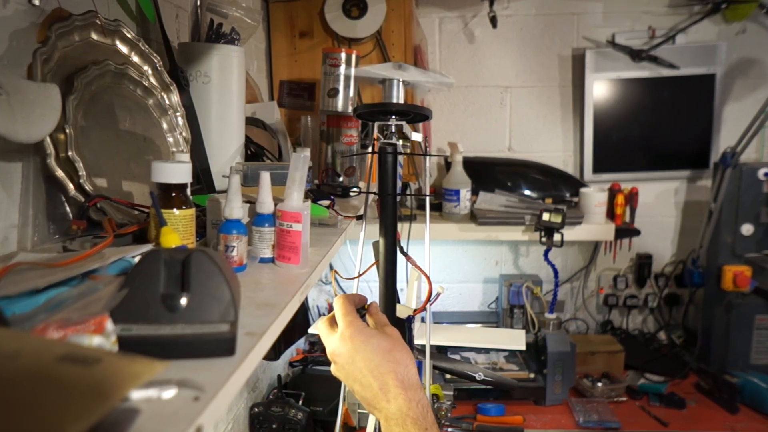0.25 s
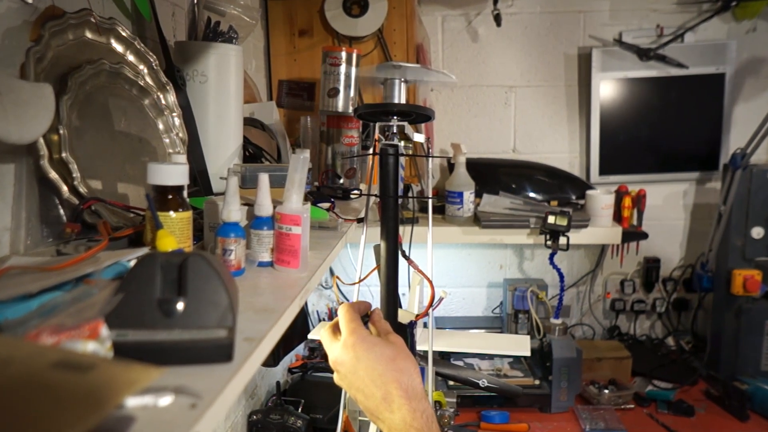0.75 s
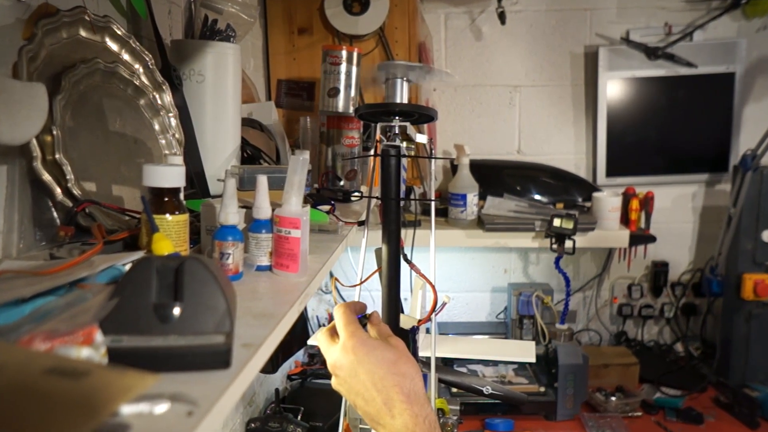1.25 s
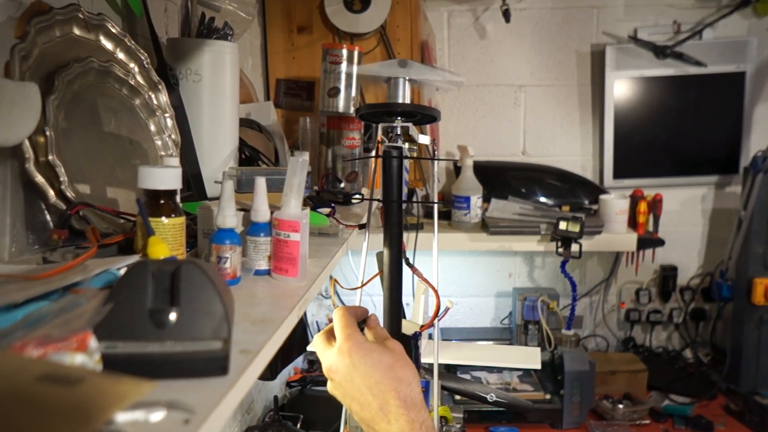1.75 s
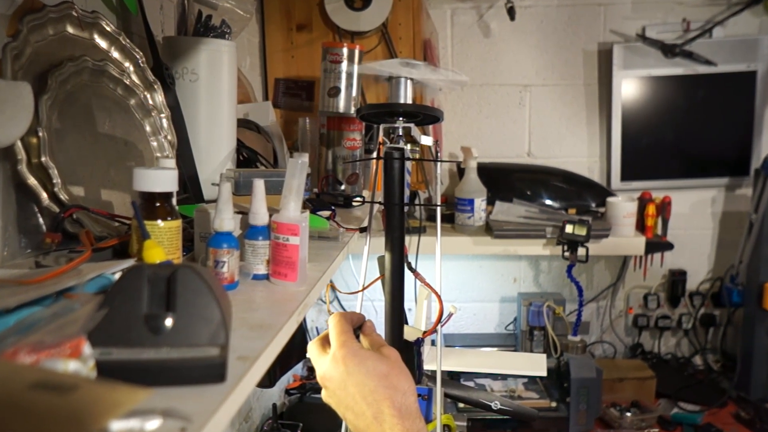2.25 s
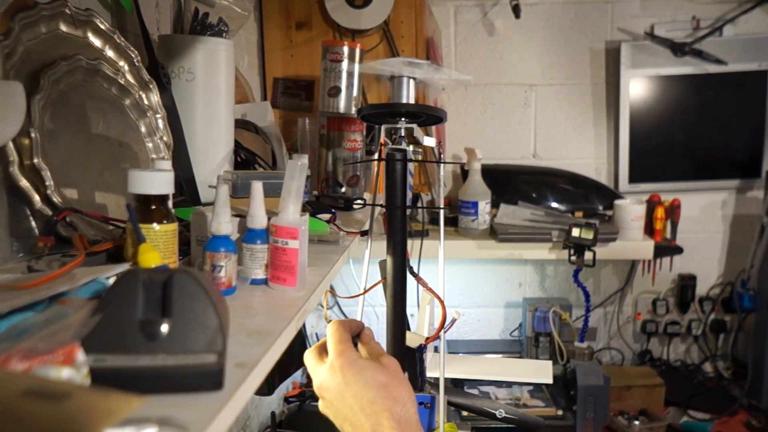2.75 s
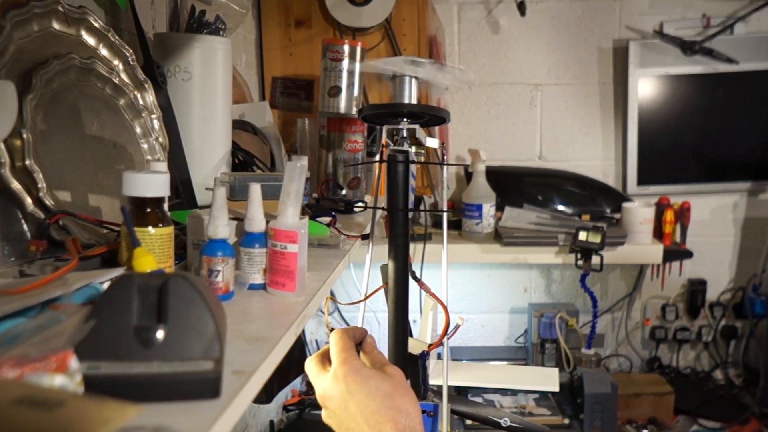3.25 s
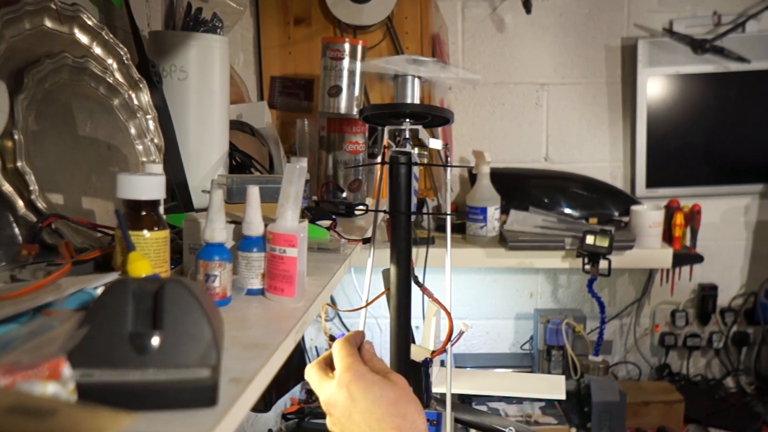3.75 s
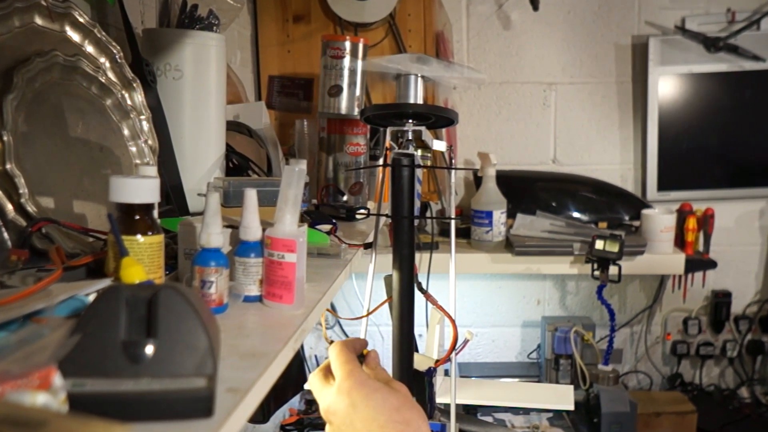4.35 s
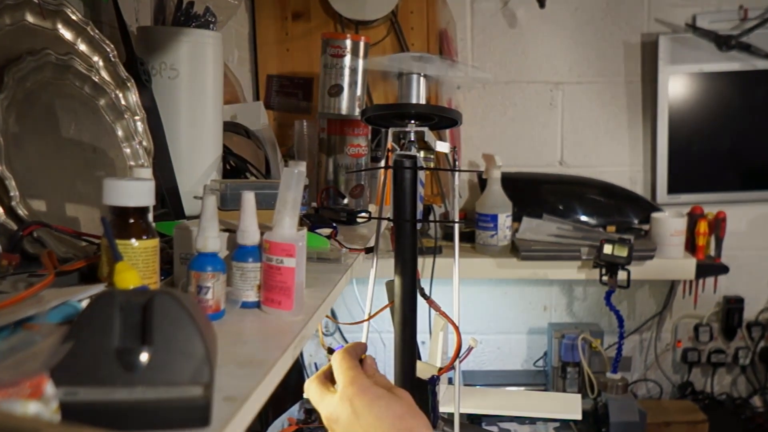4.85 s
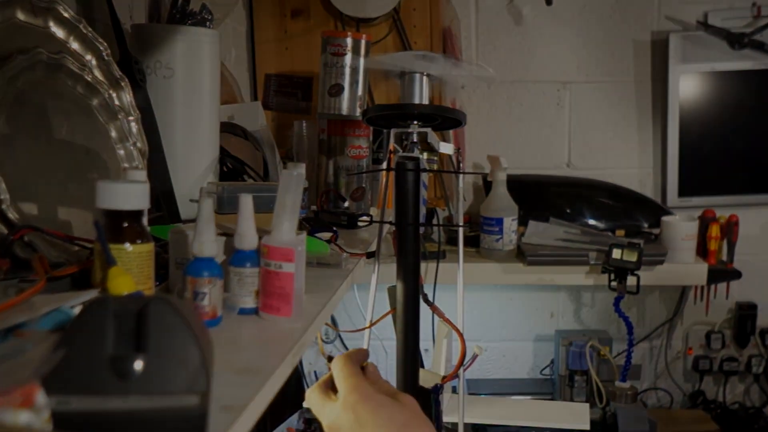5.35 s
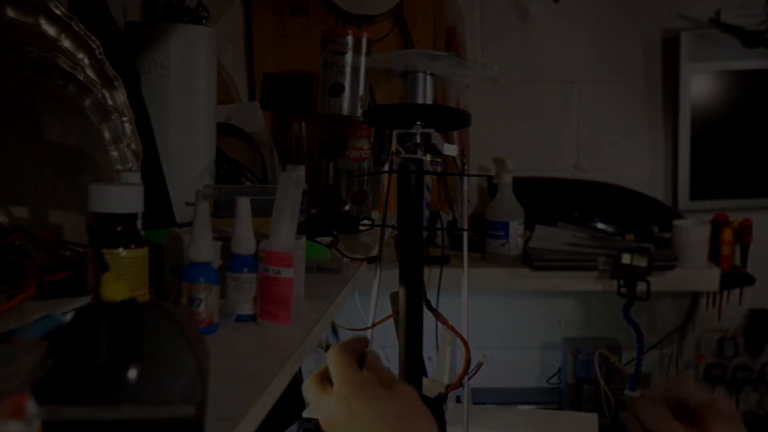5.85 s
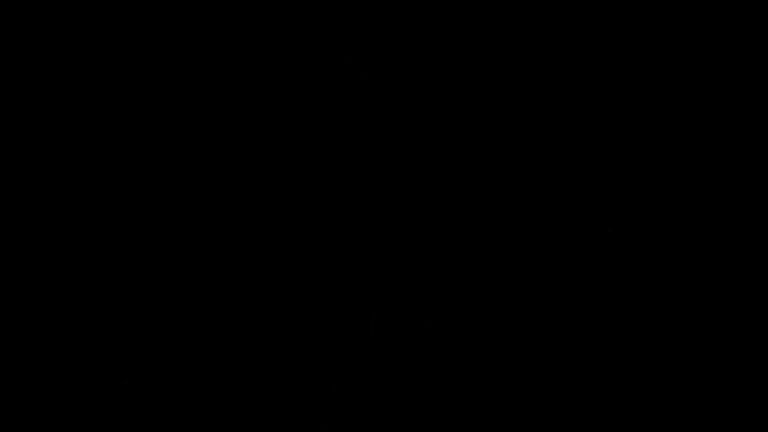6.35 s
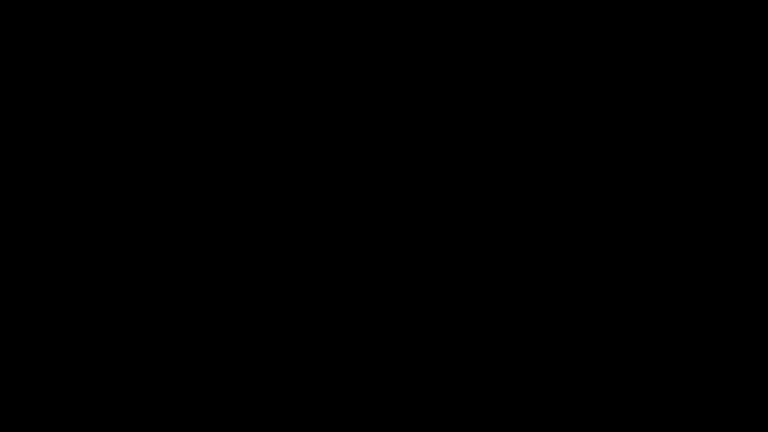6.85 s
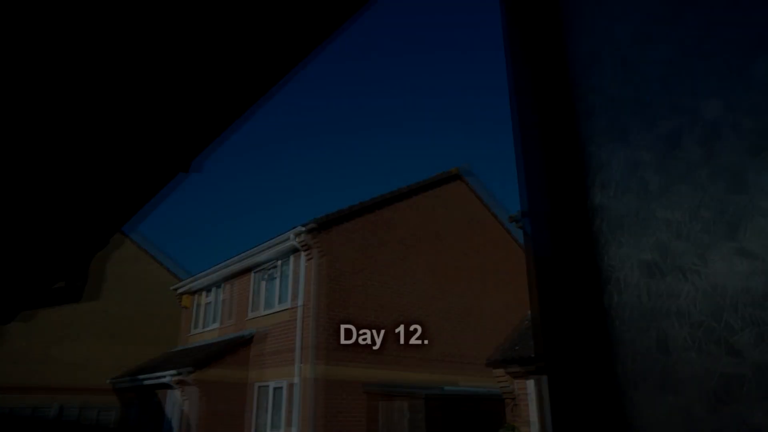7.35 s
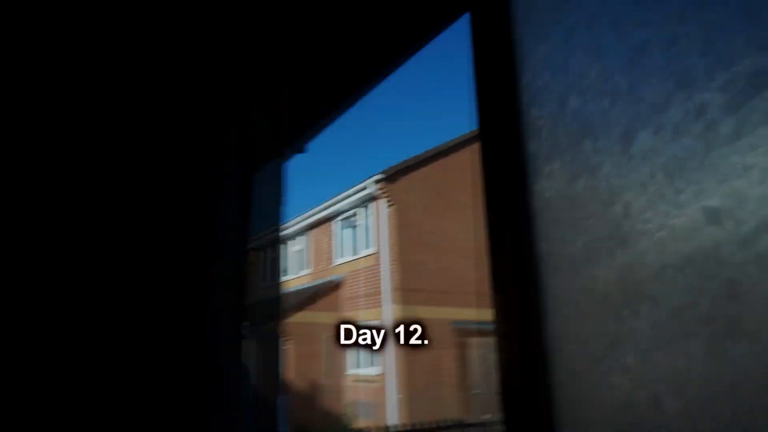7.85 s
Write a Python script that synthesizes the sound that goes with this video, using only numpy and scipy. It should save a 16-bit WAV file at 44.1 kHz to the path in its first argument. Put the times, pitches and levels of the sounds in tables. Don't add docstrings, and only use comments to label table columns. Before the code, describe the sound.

A geared brushless motor runs close to a stereo microphone in a lightly reverberant workshop. Its piercing whine sags, rises and settles high while a regular rasping rub rattles the frame many times a second. After a long fade, a quiet doorway takes over: soft air, distant hum, brief echoing bird chirps, a light hand rub and a crisp metal latch knocking open.

```python
import sys
import numpy as np
from scipy import signal
from scipy.fft import rfft, irfft, next_fast_len
from scipy.io import wavfile
from scipy.ndimage import uniform_filter1d, map_coordinates

SR = 44100
rng = np.random.default_rng(int(sys.argv[2]) if len(sys.argv) > 2 else 0)


def generate_wav(signal):
    frames = np.transpose(np.atleast_2d(signal))
    scaled = np.clip(frames, -1, 1) * 32767
    pcm = np.round(scaled).astype(np.int16)
    wavfile.write(sys.argv[1], SR, pcm)


def to_linear_factor(level_db):
    exponent = np.asarray(level_db, float) / 20
    return 10 ** exponent


N = 357210

# (time [s], pole whine [Hz], whine level [dB])
MOTOR_RUN = [(0.0, 2123, -33.5), (0.25, 1900, -37), (0.46, 1815, -46), (0.64, 1820, -41.5),
             (0.8, 1943, -40.5), (1.0, 2010, -35), (1.62, 2052, -45), (2.08, 2201, -30), (2.42, 2300, -37),
             (2.74, 2368, -28), (3.19, 2442, -35.5), (3.55, 2590, -31), (3.83, 2728, -26.5),
             (4.0, 2762, -23), (4.37, 2784, -27.5), (4.43, 2800, -41), (4.49, 2882, -27.5),
             (6.8, 2890, -25)]
POLES, GEAR_RATIO = 14, 10
POLES_PER_TURN = GEAR_RATIO * POLES
# (start [s], end [s])
WORKSHOP_FADE = (4.8, 6.803)
# (frequency [Hz], t60 [s])
SHOP_T60 = [(300, .3), (3000, 0.25), (12000, .12)]


def unit(x):
    return x / np.sqrt(np.mean(x ** 2) + 1e-20)


def along(points, hz):
    f, v = np.transpose(points)
    return np.interp(np.log(hz + 1), np.log(f + 1), v)


def curves(rows):
    s, *cols = np.transpose(rows)
    return [np.interp(np.arange(N) / SR, s, c) for c in cols]


def wobble(rate):
    knots = rng.standard_normal(int(N * rate / SR) + 4)
    return map_coordinates(knots, [np.arange(N) * rate / SR])


def filtered(x, response):
    m = next_fast_len(N + SR // 2)
    return irfft(rfft(x, m) * response(np.fft.rfftfreq(m, 1 / SR)), m)[..., :N]


def ringing(modes, hz):
    grid = np.arange(0, SR / 2, 4)
    power = sum(to_linear_factor(db) ** 2 / (1 + (2 * (grid - c) / w) ** 2) ** 1.348 for c, w, db in modes)
    return np.interp(hz, grid, np.sqrt(power))


def gritty(grit_db, rate):
    return unit(rng.standard_normal((2, N)) * to_linear_factor(grit_db * wobble(rate)))


def patchy(x, patchy_db):
    z = signal.stft(x, nperseg=512)[2]
    field = uniform_filter1d(rng.standard_normal(z.shape[1:]), size=7, axis=0)
    field = uniform_filter1d(field, size=8, axis=1)
    return unit(signal.istft(z * to_linear_factor(patchy_db * unit(field)), nperseg=512)[1][:, :N])


def spread(pair, response):
    # (frequency [Hz], likeness [0-1])
    likeness = [(40, 0.94), (150, 1), (500, .96), (2000, 0.95), (4500, 0.86), (7500, 0.98), (11000, 1),
                (13000, 1)]

    def mid_side(hz):
        turn = np.arccos(np.clip(along(likeness, hz), -1, 1)) / 2
        return response(hz) * [np.cos(turn), np.sin(turn)]

    mid, side = filtered(pair, mid_side)
    return np.array([mid + side, mid - side])


def room(x, t60s):
    hz, t, z = signal.stft(rng.standard_normal((2, SR // 2)), SR, nperseg=256)
    tail = signal.istft(z * to_linear_factor(-60 * t / along(t60s, hz)[:, None]), SR, nperseg=256)[1]
    wet = signal.fftconvolve(x, tail / np.linalg.norm(tail[0]), axes=1)[:, :N]
    return spread(wet, np.ones_like)


def whine():
    # (pole whine [Hz], level [dB])
    octave_level = [(1810, -41.5), (2030, -42), (2110, -31.5), (2190, -37.5), (2270, -32.5), (2310, -24.5),
                    (2500, -27.5), (2545, -44), (2890, -58)]
    shaft_level = [(1900, -72), (2400, -68), (2640, -62), (2765, -56), (2890, -60)]
    fourth_level = [(1900, -60), (2500, -58.5), (2650, -42.5), (2750, -43), (2780, -54), (2890, -52)]
    switch_level = [(1900, -46.5), (2300, -42), (2630, -47), (2890, -67.5)]
    sideband_level = [(1815, -47), (1900, -41), (2040, -48.5), (2200, -42), (2450, -35.5), (2540, -47.5),
                      (2760, -52), (2890, -61.5)]
    # (pole whine [Hz], left over right [dB])
    whine_pan = [(2300, -0.3), (2630, 4), (2770, -0.5), (2880, -5)]
    switch_hz = 8009

    pole_hz, whine_db = curves(MOTOR_RUN)

    def level(points, rate):
        return to_linear_factor(along(points, pole_hz) + 1.8 * wobble(rate))

    pole = 2 * np.pi * np.cumsum(pole_hz + 1.5 * wobble(25)) / SR
    switch = 2 * np.pi * switch_hz * np.arange(N) / SR
    turn = pole / POLES_PER_TURN
    throb = 1 + 0.23 * np.sin(2 * turn) + 0.15 * np.sin(turn)
    octave = level(octave_level, 9) * throb * to_linear_factor(1.8 * wobble(28)) * np.sin(2 * pole)
    shaft = level(shaft_level, 2.6) * np.sin(pole / POLES)
    fourth = level(fourth_level, 3.9) * np.sin(4 * pole)
    sideband = level(sideband_level, 2.5) * np.sin(switch + pole)
    switching = level(switch_level, 3) * np.sin(switch)
    pan_db = along(whine_pan, pole_hz)
    main = to_linear_factor(whine_db + 1.9 * wobble(30)) * np.sin(pole + np.array([[.3], [-.3]]))
    main = main * to_linear_factor([pan_db / 2, -pan_db / 2])
    return np.sqrt(2) * (main + octave + shaft + fourth + sideband + switching)


def rubs(whirr_db):
    # (time [s], hiss level [dB], length [ms])
    marked_rubs = [(0.041, -23, 14.6), (0.1, -35.5, 25), (0.165, -21.5, 20), (0.238, -24, 23),
                   (0.306, -39.5, 25), (0.385, -24.5, 29), (0.469, -26.5, 29), (0.609, -26, 44),
                   (0.759, -23.5, 49), (0.911, -20.5, 16), (0.978, -20.5, 17.8), (1.12, -26, 88),
                   (1.198, -22.5, 17), (1.257, -23.5, 61), (1.459, -24, 66), (1.599, -22.5, 39),
                   (1.677, -23.5, 79), (2.062, -27.5, 45), (2.313, -20, 15), (2.435, -19.5, 12),
                   (2.85, -25, 19.7), (3.204, -26, 35), (3.491, -25.5, 36), (3.859, -28, 29),
                   (4.211, -24, 27.4), (4.268, -36, 44), (4.394, -25.5, 45), (5.255, -26.5, 22),
                   (5.876, -30.5, 33), (6.413, -30.5, 26)]
    rub_over_whirr_db, rub_scatter_db = 0.06, 1
    length_turns, length_scatter = 0.51, 0.24
    echo_turns, echo_db, echo_scatter_db, echo_ms = .55, -9, 4, 18

    pole_hz = curves(MOTOR_RUN)[0]
    turns = np.cumsum(pole_hz) / (SR * POLES_PER_TURN)
    marked = np.array(marked_rubs)
    angle = turns[np.round(marked[:, 0] * SR).astype(int)]
    index = np.r_[0, np.cumsum(np.round(np.diff(angle)))].astype(int)
    every = np.arange(int(np.interp(WORKSHOP_FADE[1] * SR, np.arange(N), turns)))
    at = np.searchsorted(turns, every + np.interp(every, index, angle - index))
    turn_s = POLES_PER_TURN / pole_hz[at]

    luck = rng.standard_normal((N // 2000, 3))[every]
    ms = 1000 * length_turns * turn_s * np.exp(length_scatter * luck[:, 0])
    rows = np.c_[at / SR, whirr_db[at] + rub_over_whirr_db + rub_scatter_db * luck[:, 1], ms]
    rows[index] = marked
    late_s = rows[:, 0] + echo_turns * turn_s
    late_db = whirr_db[at] + echo_db + echo_scatter_db * luck[:, 2]
    return np.r_[rows, np.c_[late_s, late_db, np.full(len(at), echo_ms)]]


def rotor():
    # (time [s], whirr level [dB], rattle over rub hiss [dB])
    whirr_run = [(0, -27, 12), (.6, -24, 4), (1.8, -25, 4.5), (3.6, -26.5, 6), (4.6, -31, 4.5),
                 (5.2, -31.5, 7), (6.8, -29, 5.5)]
    # (centre [Hz], width [Hz], level [dB])
    mast_modes = [(392, 37, -26), (606.5, 87, -15.5), (756.6, 53, -7.5), (933, 206, -9.5), (1067, 70, -1),
                  (1105.7, 17.2, 6), (1255, 99, -8), (1397, 67, -7.5), (1715, 130, -6.5), (2250, 210, -8),
                  (2540, 150, -5), (2840, 215, 1.5), (3157, 320, -4), (3674, 310, -1), (3986, 120, -1.5),
                  (4283, 160, -2.5), (4950, 290, -4), (5594, 250, -2.5), (6063, 420, -4), (6750, 130, -6.5),
                  (7275, 320, -7), (8585, 200, -6), (9390, 130, -7), (9860, 260, -5), (10740, 180, -14),
                  (13200, 350, -14), (15200, 300, -15.5)]
    # (frequency [Hz], level [dB per Hz])
    frame_colour = [(20, -49), (60, -62.5), (250, -36.5), (500, -36.5), (1500, -14.5), (2000, -14),
                    (4500, -12), (7900, -16), (9000, -15.5), (12000, -17.5), (14500, -18.5), (15700, -27)]
    # (frequency [Hz], gain [dB])
    gear_colour = [(300, -2.5), (1100, 0.5), (2800, -5.5), (6000, -2.5), (10000, -3.5), (15000, -7.5)]
    # (centre [Hz], width [Hz], level [dB])
    tip_modes = [(15330, 330, 0), (13400, 300, -9), (9770, 350, -2), (5970, 400, -1)]
    touch_db, touch_s = -7.5, 0.018
    split_hz = 7000
    load_swing_db, load_peak_turns = 0.88, 0.31

    whirr_db, rattle_db = curves(whirr_run)
    rows = rubs(whirr_db)
    count = len(rows) // 2
    turns = np.interp(np.arange(N) / SR, rows[:count, 0], np.arange(count))
    whirr_db = whirr_db + load_swing_db * np.cos(2 * np.pi * (turns - load_peak_turns))

    hiss, rattle, touch = np.zeros((3, N))
    t = np.arange(SR // 5) / SR
    build = 1 - np.exp(-t / .005)
    for s, db, ms in rows:
        release = 1 + np.exp(np.clip((t - ms / 1000) / 0.0092, -40, 40))
        shape = (1 - np.exp(-t / 0.0028)) * to_linear_factor(-60 * t) / release
        at = round(s * SR)
        bright = 1 + .8 * np.exp(-t / 0.0033)
        hiss[at:][:len(t)] += (to_linear_factor(db) * shape) ** 2 * bright
        touch[at:][:len(t)] += (to_linear_factor(db + touch_db) * shape * np.exp(-t / touch_s)) ** 2
        rub_rattle_db = db + rattle_db[at] - 2.0 - .5 * (db + 27.0)
        rattle[at:][:len(t)] += (to_linear_factor(rub_rattle_db) * shape * build) ** 2

    def colour(hz):
        return np.hypot(to_linear_factor(along(frame_colour, hz)), ringing(mast_modes, hz))

    def high(hz):
        return 1 / (1 + (split_hz / (hz + 1)) ** 8)

    scrape = patchy(gritty(grit_db=1.5, rate=900), patchy_db=2.5)
    gears = patchy(gritty(grit_db=2.0, rate=700), patchy_db=1.18)
    layers = ((scrape * np.sqrt(hiss), lambda hz: colour(hz) * np.sqrt(high(hz))),
              (scrape * np.sqrt(rattle), lambda hz: colour(hz) * np.sqrt(1 - high(hz))),
              (scrape * np.sqrt(touch), lambda hz: ringing(tip_modes, hz)),
              (gears * to_linear_factor(whirr_db), lambda hz: colour(hz) * to_linear_factor(along(gear_colour, hz))))
    band = np.fft.rfftfreq(4096, 1 / SR)
    out = 0
    for x, response in layers:
        out = out + spread(x, response) / np.linalg.norm(response(band)) * np.sqrt(len(band))
    return out + to_linear_factor(-11) * room(out, SHOP_T60)


def doorway():
    # (time [s], level [dB])
    hum_run = [
        (6.79, -110),
        (6.83, -70),
        (6.9, -59),
        (7.18, -66.5),
        (7.38, -79),
        (8.1, -90),
    ]
    # (time [s], level [dB])
    air_run = [
        (6.79, -110),
        (6.85, -81.5),
        (6.97, -71),
        (7.69, -66),
        (7.95, -55),
        (8.1, -58.5),
    ]
    # (time [s], level [dB])
    hand_run = [
        (7.26, -110),
        (7.36, -60),
        (7.47, -57.5),
        (7.51, -64),
        (7.69, -59),
        (8.1, -50),
    ]
    # (centre [Hz], width [Hz], level [dB])
    hum_modes = [(1007, 50, 2.5), (1590, 120, -33.5), (2410, 44, -29.5), (2840, 110, -20.5)]
    # (frequency [Hz], level [dB per Hz])
    air_colour = [(60, -27.5), (300, -11), (800, 2.5), (2200, -9.5), (6000, -11.5), (14500, -19),
                  (15900, -26)]
    hand_colour = [(60, -39), (274, -16), (634, -13), (1440, -12), (2400, -3.5), (3200, -3.5),
                   (4000, -10.5), (5600, -11), (7000, -18.5), (15900, -34)]

    def noise(response):
        return unit(spread(rng.standard_normal((2, N)), response))

    (hum_db,), (air_db,), (hand_db,) = curves(hum_run), curves(air_run), curves(hand_run)
    hum = to_linear_factor(hum_db + 1.5 * wobble(9)) * noise(lambda hz: ringing(hum_modes, hz))
    air = to_linear_factor(air_db) * noise(lambda hz: to_linear_factor(along(air_colour, hz)))
    slide = patchy(noise(lambda hz: to_linear_factor(along(hand_colour, hz))), patchy_db=3.5)
    return hum + air + to_linear_factor(hand_db + 1.5 * wobble(23)) * slide


def bird():
    # (time [s], start [Hz], end [Hz], glide [s], hold [s], level [dB])
    chirps = [
        (6.924, 4470, 5840, 0.023, 0.015, -64),
        (7.024, 3890, 5010, 0.03, 0.012, -58),
        (7.669, 5900, 5000, .015, .003, -61),
    ]
    # (frequency [Hz], t60 [s])
    street_t60 = [(1000, .7), (5000, 0.97), (12000, 0.31)]

    out = np.zeros(N)
    for s, start_hz, end_hz, glide, hold, db in chirps:
        t = np.arange(int((glide + hold) * SR)) / SR
        hz = end_hz + (start_hz - end_hz) * np.clip(1 - t / glide, 0, 1) ** 0.85
        whistle = np.hanning(len(t)) ** .5 * np.sin(2 * np.pi * np.cumsum(hz) / SR)
        out[round(s * SR):][:len(t)] += to_linear_factor(db) * whistle
    return out + to_linear_factor(5.5) * room(out[None], street_t60)


def latch():
    # (time [s], click level [dB], door knock level [dB], clunk level [dB], t60 [s])
    contacts = [(7.345, -68, -62, -78, .05), (7.71, -55.5, -35, -38.5, .07), (7.726, -22.5, -27, -34, .035),
                (7.779, -51, -30, -42, 0.074), (7.801, -46, -27, -43.5, 0.096),
                (7.8156, -39, -20.5, -47, 0.065), (7.832, -35, -36, -51.5, 0.1),
                (7.851, -30, -22.5, -49, 0.07), (7.86, -30.5, -22.5, -21.5, 0.077),
                (7.8761, -39.5, -38.5, -25, 0.029), (7.92, -45.5, -43, -40.5, 0.13),
                (8.013, -43, -32.5, -36, 0.086)]
    # (frequency [Hz], level [dB per Hz])
    bolt_colour = [(1470, -52), (2500, -21), (3080, -1.5), (3620, -12), (5300, -15), (8900, -19),
                   (9690, -20), (15900, -30)]
    # (centre [Hz], width [Hz], level [dB])
    panel_modes = [(1050, 130, -3), (1495, 110, 1.5), (1820, 170, -3.5), (2210, 140, -2.5), (2500, 200, -6),
                   (2800, 250, -1.5), (3200, 300, -10), (5200, 1200, -19.5)]
    body_modes = [(180, 46, -11.5), (285, 45, -3.5), (403, 50, -5), (544, 74, 7.5), (804, 130, -3.5)]
    # (time [s], length [s], level [dB])
    slip_bursts = [
        (7.778, .018, -31),
        (7.797, .016, -26.5),
        (7.814, .02, -37),
        (7.838, .035, -45),
    ]
    squeak_hz, sag_hz_per_s, squeak_low_hz = 9800, 8000, 9680
    low_hz = 110

    blows, t = np.zeros((3, N + SR)), np.arange(SR // 4) / SR
    for s, click_db, knock_db, clunk_db, t60 in contacts:
        t60s = np.clip(t60 * np.array([[.6], [.9], [1.4]]), .005, 1)
        decay = (1 - np.exp(-t / .0015)) * to_linear_factor(-60 * t / t60s)
        level = to_linear_factor([[click_db + 2.5], [knock_db - 2], [clunk_db - 3.5]])
        blows[:, round(s * SR):][:, :len(t)] += level * decay
    colours = (lambda hz: to_linear_factor(along(bolt_colour, hz)),
               lambda hz: ringing(panel_modes, hz),
               lambda hz: ringing(body_modes, hz))
    out = sum(b[:N] * unit(spread(rng.standard_normal((2, N)), c)) for b, c in zip(blows, colours))
    out = filtered(out, lambda hz: 1 / (1 + (low_hz / (hz + 1)) ** 4))

    now = np.arange(N) / SR
    hz = np.clip(squeak_hz - sag_hz_per_s * (now - slip_bursts[0][0]), squeak_low_hz, squeak_hz)
    slips = np.zeros(N)
    for s, length, db in slip_bursts:
        slips += to_linear_factor(db) * np.sin(np.pi * np.clip((now - s) / length, 0, 1)) ** .7
    squeak = slips * to_linear_factor(1.5 * wobble(200))
    squeak = squeak * np.sin(2 * np.pi * np.cumsum(hz + 110 * wobble(400)) / SR)
    return out + squeak + to_linear_factor(-4.5) * room(out + .3 * squeak, SHOP_T60)


def scene():
    start_s, end_s = WORKSHOP_FADE
    fade = np.clip((end_s - np.arange(N) / SR) / (end_s - start_s), 0, 1)
    return fade * (whine() + rotor()) + doorway() + bird() + latch()


def band_limit(x):
    return signal.sosfilt(signal.butter(12, 16680, fs=SR, output="sos"), x)


def record(dry):
    # (frequency [Hz], gain [dB])
    bass_cut = [(25, -13), (80, -9), (130, -8), (200, 0)]
    top_hz = 15700
    mix = filtered(dry, lambda hz: to_linear_factor(along(bass_cut, hz)) * (hz < top_hz))
    return band_limit(mix)


dry = scene()
out = record(dry)
generate_wav(out)
```